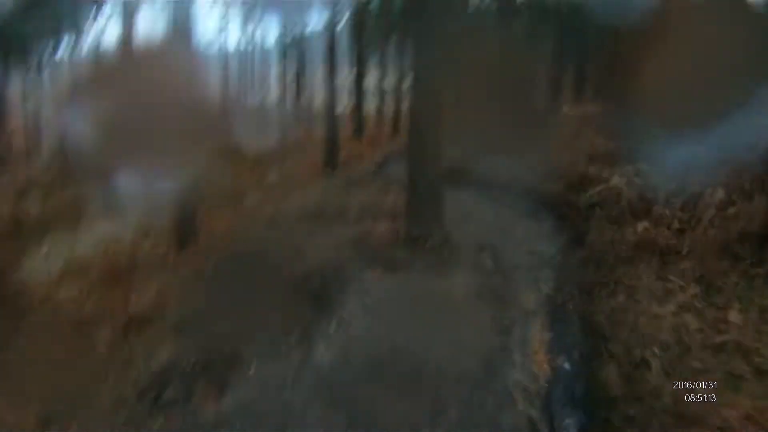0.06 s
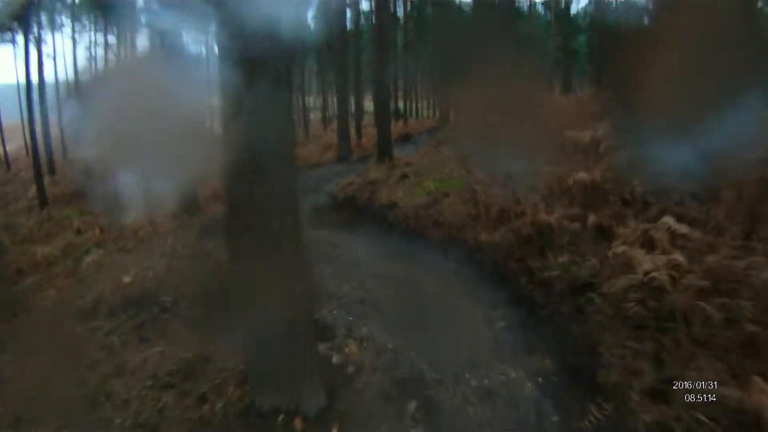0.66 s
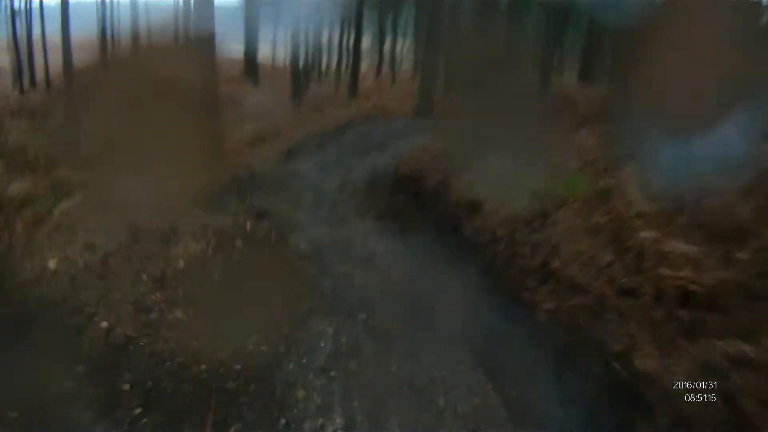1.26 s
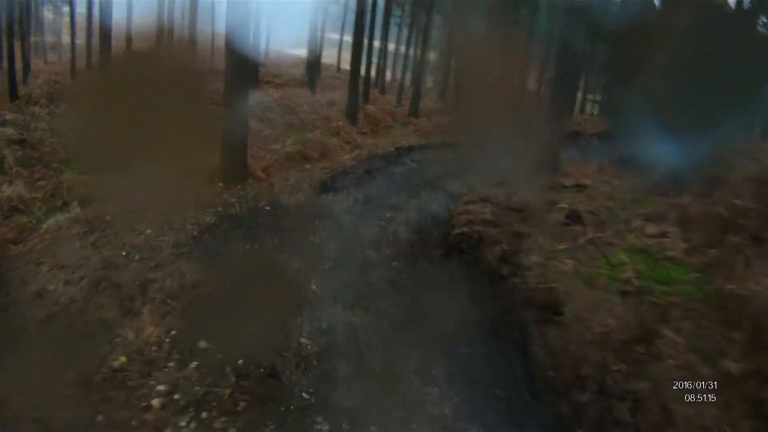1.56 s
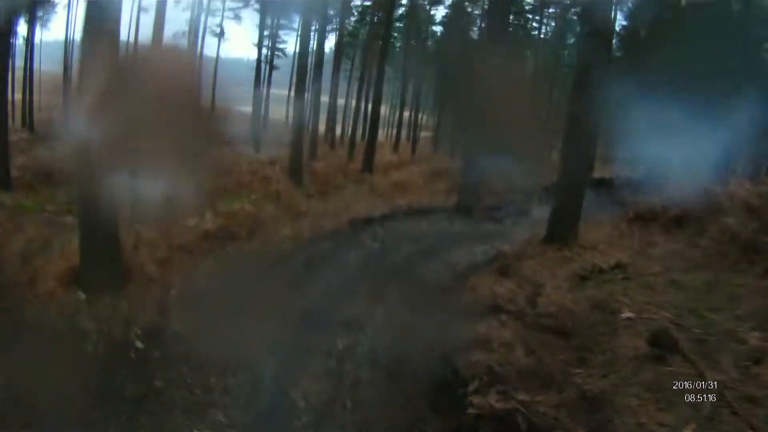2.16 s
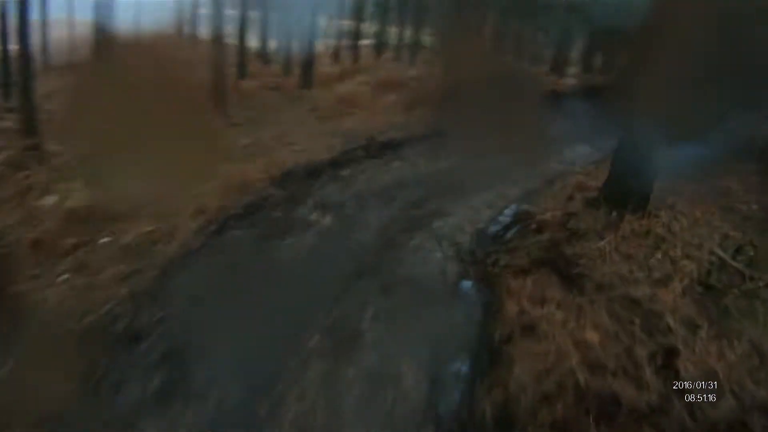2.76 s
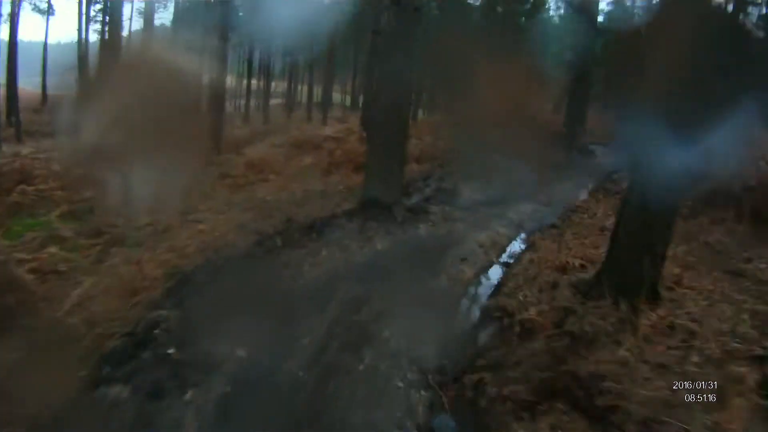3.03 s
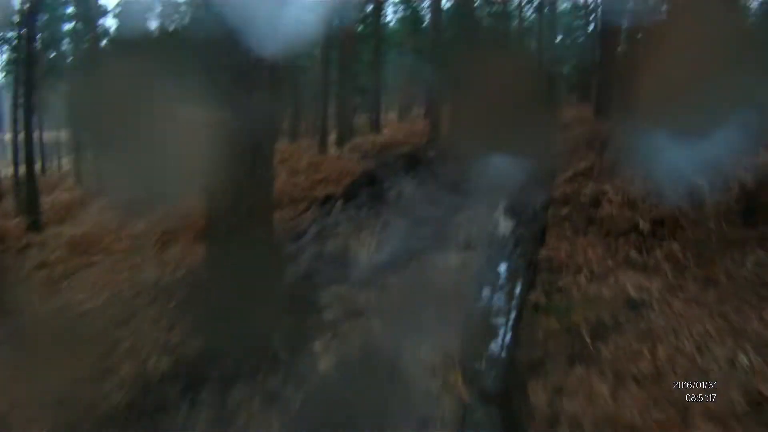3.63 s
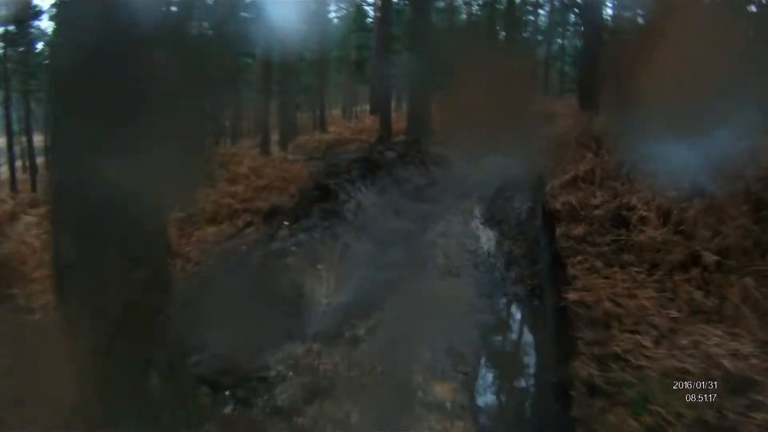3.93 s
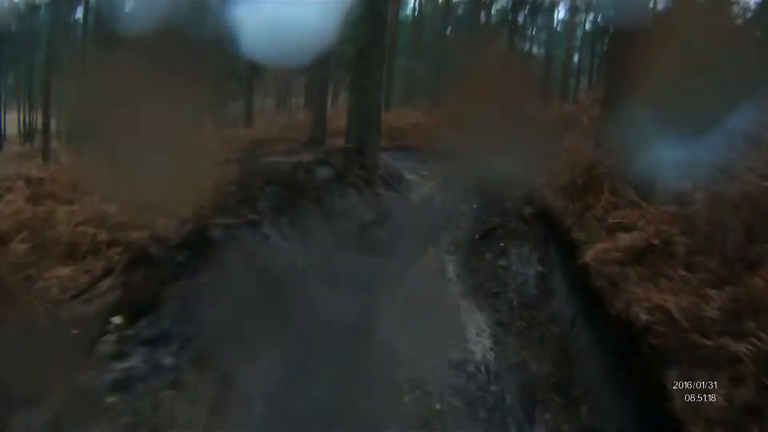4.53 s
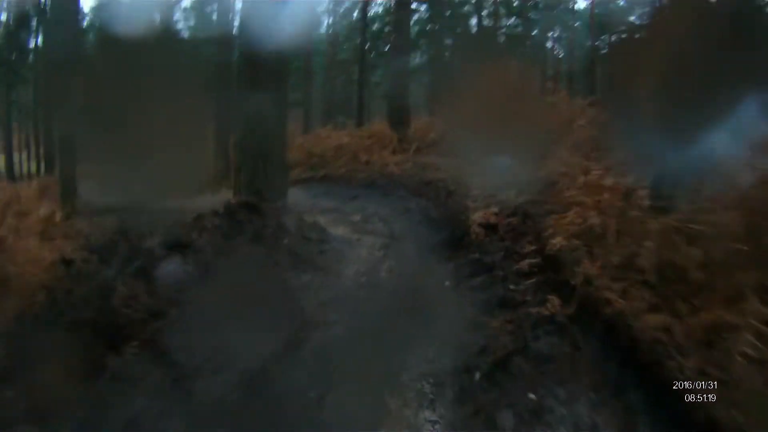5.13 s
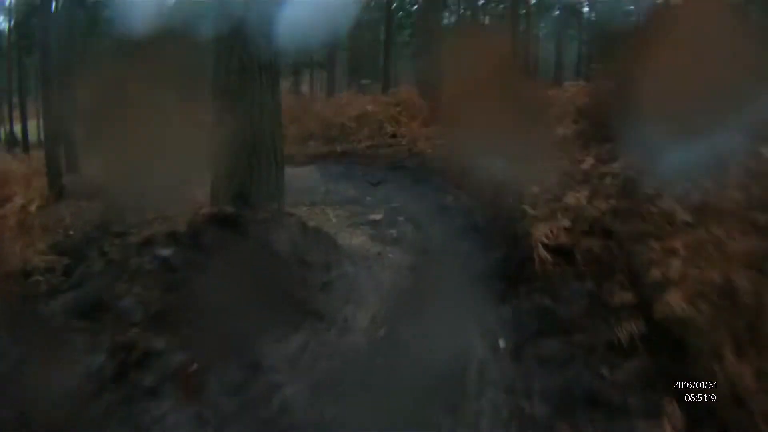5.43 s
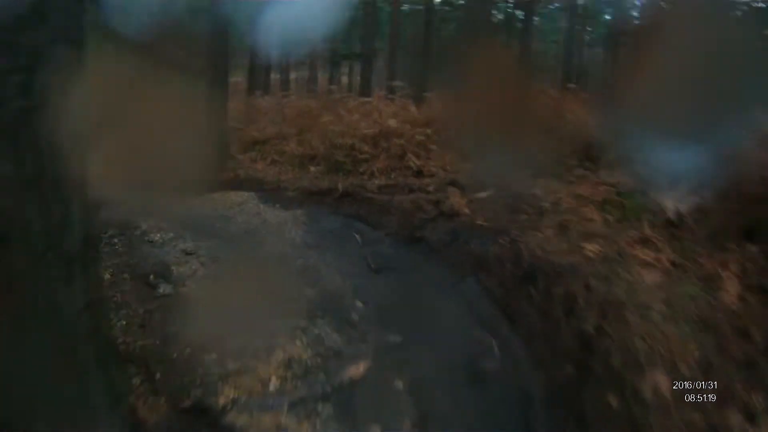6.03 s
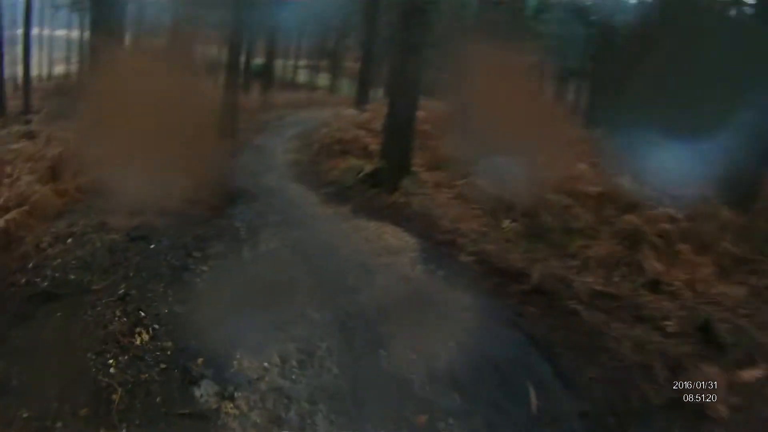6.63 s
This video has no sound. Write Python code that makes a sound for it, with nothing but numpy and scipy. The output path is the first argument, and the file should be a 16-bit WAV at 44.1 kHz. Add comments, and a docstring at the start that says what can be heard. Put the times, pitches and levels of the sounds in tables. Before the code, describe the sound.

A bicycle rolls over bumpy dirt, its chain clattering and tyres crunching, under wind that gusts and then dies away.

```python
"""Wind rushes and tyres crunch as a mountain bike rolls down a damp, bumpy forest trail, heard from a
camera in a closed plastic case. Turbulent air swells and fades around the case, over the camera's
own hiss and thin whine. Bumps rattle the chain and frame, and flung grit ticks against the bike;
these contacts are coloured by the resonances of the case. Once, a stone strikes the case itself."""
import sys
import numpy as np
from scipy import signal
from scipy.fft import rfft, irfft, next_fast_len
from scipy.io import wavfile
from scipy.ndimage import uniform_filter1d, map_coordinates

SR = 44100
rng = np.random.default_rng(int(sys.argv[2]) if len(sys.argv) > 2 else 0)


def int16_out(signal):
    """Quantize to a 16-bit WAV file."""
    q = np.round(np.clip(np.atleast_2d(signal).T, -1, 1) * 32767)
    wavfile.write(sys.argv[1], SR, q.astype(np.int16))


N = 299439
T = np.arange(N) / SR


def amp(db):
    """The decibel scale: 20 dB is a factor of ten in amplitude."""
    return 10 ** (np.asarray(db) / 20)


def unit(x):
    """Normalisation to an rms of 1."""
    return x / np.sqrt(np.mean(x ** 2) + 1e-20)


def along(points, hz):
    """Interpolation of (Hz, dB) points on a logarithmic frequency axis."""
    point_hz, point_db = np.transpose(points)
    return np.interp(np.log(hz + 1), np.log(point_hz + 1), point_db)


def level_curve(points):
    """Linear interpolation of (seconds, dB) points at every sample."""
    return np.interp(T, *np.transpose(points))


def swell(s, length):
    """A generalised Gaussian envelope, 1 at time s; an exponent above 2 flattens its top."""
    return np.exp(-np.abs(2 * (T - s) / length) ** 2.7)


def wobble(rate):
    """Smooth random modulation: a spline through rate knots a second."""
    return map_coordinates(rng.standard_normal(int(N * rate / SR) + 4), [T * rate])


def coloured(x, gain_db):
    """Minimum-phase filtering: folding the cepstrum gives a causal filter of gain gain_db(hz)."""
    size = 2 * next_fast_len(len(x) // 2 + 4096)
    gain = amp(gain_db(np.fft.rfftfreq(size, 1 / SR)))
    cepstrum = irfft(np.log(gain + 1e-6))
    cepstrum[1:size // 2] *= 2
    cepstrum[size // 2 + 1:] = 0
    return irfft(rfft(x, size) * np.exp(rfft(cepstrum)))[:len(x)]


def noise(spectrum):
    """Spectral shaping of white noise, at an rms of 1."""
    return unit(coloured(rng.standard_normal(N), lambda hz: along(spectrum, hz)))


def grains(size, rate, spread_db):
    """A Poisson process: rate tiny impacts a second, of random sign and strength."""
    hits = rng.random(size) < rate / SR
    signs = rng.choice([-1, 1], size)
    strengths = amp(spread_db * np.clip(rng.standard_normal(size), -2, 2))
    return unit(hits * signs * strengths)


# Air flow, rising and falling with riding speed. Each row: time in seconds, relative level in dB.
AIR_FLOW = [(0, -50.5), (.3, -46.5), (.8, -46), (1.08, -42.5), (1.17, -51.5), (1.24, -46.5), (1.93, -50.5),
            (2.02, -43.5), (2.64, -44.5), (2.85, -54), (3.38, -63), (3.97, -63.5), (4.15, -57),
            (4.6, -56.5), (5.38, -59), (5.8, -74.5), (6.2, -82), (6.5, -73)]
# Gusts on top of the flow. Each row: peak time in seconds, length in seconds, relative level in dB,
# share of large eddies from 0 to 1.
GUSTS = [(0.058, 0.049, -47.5, .1), (2.313, .06, -44.5, 0.05), (2.496, 0.034, -41, 0.02),
         (2.637, 0.074, -43, .7), (2.936, 0.085, -50, 0.35), (3.007, 0.056, -46, 0.4),
         (3.195, .11, -46, 0.65), (3.551, 0.12, -49, 0.3), (3.714, 0.077, -48, 0.6), (3.815, .11, -46, .15),
         (4.981, 0.079, -50, 0), (5.37, 0.13, -61.5, .3), (6.288, 0.058, -67, 0.9)]
# Jolts that shove air against the case. Each row: peak time in seconds, length in seconds, level in dB.
JOLTS = [(1.735, .05, -56), (2.292, .05, -60), (2.52, .08, -64), (2.615, .04, -56), (2.7, 0.037, -57),
         (3.14, 0.23, -62), (3.85, .05, -65), (5.1, .3, -70)]
# Spectra of the rush and the buffeting. Each row: frequency in Hz, relative level in dB.
RUSH_SPECTRUM = [(30, -37), (80, -23), (150, -9.5), (250, -1.5), (420, 1), (620, -2), (900, -9),
                 (1400, -17.5), (2500, -30), (5000, -62)]
BUFFET_SPECTRUM = [(10, -0.5), (28, -10.5), (60, -9.5), (110, -8), (250, -25), (800, -84)]
# Colouring of the rush by large eddies. Each row: frequency in Hz, relative gain in dB.
LARGE_EDDY_GAIN = [(60, 5), (120, 10), (210, 5.5), (380, -2), (700, -10)]
def wind():
    """Turbulence: slow flow sheds larger, deeper eddies; pressure on the case buffets and thumps."""
    flow_db = level_curve(AIR_FLOW)
    deep_below_db, transition_db = -52.5, 4
    power = amp(flow_db) ** 2
    large_power = power * (1 - np.tanh((flow_db - deep_below_db) / transition_db)) / 2
    for s, length, db, share in GUSTS:
        gust = amp(db) ** 2 * swell(s, length)  # incoherent sources add in power
        power += gust
        large_power += np.clip(share, 0, 1) * gust
    large_eddies = unit(coloured(noise(RUSH_SPECTRUM), lambda hz: along(LARGE_EDDY_GAIN, hz)))
    small_eddies = noise(RUSH_SPECTRUM)
    air = np.sqrt(np.abs(power - large_power)) * small_eddies + np.sqrt(large_power) * large_eddies
    rush = amp(-1.51 + 1.7 * wobble(rate=45)) * air
    mean_flow_db = uniform_filter1d(10 * np.log10(power), SR)  # buffeting follows a one-second mean
    buffet = amp(-70.5 + 0.36 * (mean_flow_db + 50) + 3 * wobble(rate=14))
    thump_power = sum(amp(db) ** 2 * swell(s, length) for s, length, db in JOLTS)
    return rush + np.sqrt(buffet ** 2 + thump_power) * noise(BUFFET_SPECTRUM)


# Transmission of contact sound through the case. Each row: frequency in Hz, gain in dB.
CASE_RESPONSE = [(100, -25.5), (500, -25.5), (950, -14), (1220, -8.5), (1350, 0.5), (1450, 4), (1650, -7),
                 (2100, -10.5), (2400, -9), (2950, -12), (3550, -8.5), (4200, -18.5), (5100, -34.5),
                 (9000, -50.5), (14000, -57)]
def contact(force, hardness, ring_hz, ring_db, width_hz):
    """Structure-borne sound: a force excites two inharmonic modes and is filtered by the case."""
    def resonance(hz, centre_hz, db):
        return amp(db) ** 2 / (1 + (2 * (hz - centre_hz) / width_hz) ** 2)

    def gain_db(hz):
        octaves = np.log2(np.clip(hz, 900, 6000) / 1440)
        tilt_db = hardness * octaves  # harder contacts are brighter
        modes = resonance(hz, ring_hz, ring_db) + resonance(hz, 1.29 * ring_hz, ring_db - 6)
        return along(CASE_RESPONSE, hz) + tilt_db + 10 * np.log10(0.5 + modes)

    return coloured(force, gain_db)


# Tyre noise, louder on rough ground. Each row: time in seconds, relative level in dB.
ROLLING = [(0, -53), (.22, -52), (.62, -60.5), (1.0, -52), (1.16, -53.5), (1.36, -51.5), (1.55, -55),
           (1.88, -52), (2.38, -54.5), (2.6, -46.5), (3.05, -56.5), (3.34, -52.5), (3.62, -60), (4.48, -59),
           (4.66, -53), (5.5, -59), (5.95, -58), (6.2, -60.5), (6.79, -62.5)]
# Crests that unload the tyres. Each row: centre time in seconds, length in seconds, dip in dB.
CRESTS = [(1.145, .05, 4), (1.81, 0.034, 5), (3.103, 0.044, 5), (5.57, 0.06, 5.5), (6.184, 0.095, 5)]
# Crackles of fine grit. Each row: resonance in Hz, hardness in dB per octave.
GRIT = [(2500, 0.5), (3500, 4)]
def tyres():
    """Granular noise: knobs crush wet dirt into a hollow crunch, a brighter spray and sparse crackles."""
    def dirt():
        return grains(N, rate=1000, spread_db=3) + 0.68 * rng.standard_normal(N)

    crunch = unit(contact(dirt(), hardness=-3.5, ring_hz=1430, ring_db=-12, width_hz=150))
    spray = unit(contact(dirt(), hardness=8, ring_hz=3530, ring_db=-1.5, width_hz=800))
    grit = unit(sum(contact(grains(N, rate=16, spread_db=3), hardness, hz, ring_db=9, width_hz=700)
                    for hz, hardness in GRIT))
    crunch *= amp(-1 + 2.3 * wobble(rate=35))
    spray *= amp(-8.5 + 2.4 * wobble(rate=25))
    dip_db = sum(db * swell(s, length) for s, length, db in CRESTS)
    return amp(level_curve(ROLLING) - dip_db) * (crunch + spray + amp(-9.5) * grit)


# Spectrum of the preamplifier hiss. Each row: frequency in Hz, relative level in dB.
HISS_SPECTRUM = [(30, 9), (200, 3.5), (700, 9), (4000, 7.5), (7000, -0.5), (9000, 1.5), (11000, -1),
                 (15000, -1.5)]
def electronics():
    """Self-noise: preamplifier hiss and a thin whine whose phase reverses sixty times a second."""
    whine = np.sin(2 * np.pi * 7867.3 * T) * signal.square(np.pi * 60.07 * T)
    return amp(-68) * whine + amp(-69.5) * noise(HISS_SPECTRUM)


# Bumps that shake the chain and frame. Each row: start in seconds, length in seconds, relative level
# in dB, hardness in dB per octave, resonance in Hz, resonance strength in dB.
BUMPS = [(.075, 0.012, -45.5, 8, 2820, 4), (0.117, 0.022, -39, 0.5, 1900, 18),
         (0.159, 0.079, -44, -3.5, 1835, 18), (0.269, 0.044, -47.5, 2, 1800, 7),
         (1.011, 0.019, -41, -3.5, 3720, 14), (1.032, .011, -46.5, 6.5, 3820, 13),
         (1.089, 0.013, -48, 4, 3020, 12), (1.205, 0.0086, -43, 6.5, 4340, 10),
         (1.322, 0.026, -43.5, -8.5, 3690, 12), (1.388, .015, -45, -9.5, 3620, 11),
         (1.625, 0.0074, -43, 10, 3720, 7), (1.666, 0.012, -43.5, 1, 2840, 9),
         (1.688, 0.0092, -38, 3, 3470, 13), (1.709, 0.013, -47, -5, 2900, 12),
         (1.826, 0.033, -40, -0.5, 4140, 5), (1.9, 0.02, -42, -5, 3400, 10),
         (2.001, 0.011, -45, 10, 2530, 14), (2.143, 0.013, -45.5, -2.5, 4280, 11),
         (2.168, 0.034, -45, 3, 3580, 6), (2.229, 0.033, -45, -7.5, 2590, 7),
         (2.342, 0.0083, -39, 4, 3170, 7), (2.49, 0.019, -40, 3, 3860, 5), (2.519, 0.024, -42, 4, 2500, 8),
         (2.549, 0.025, -37, -5, 1940, 0), (2.572, 0.01, -35, -5, 2730, 6), (2.618, .013, -42, -3, 2250, 8),
         (2.64, 0.0098, -35.5, -1, 2620, 9), (2.676, 0.014, -39, -3.5, 2560, 5),
         (2.728, 0.023, -42.5, -13, 4070, 3), (2.761, 0.017, -43, -7, 3210, 16),
         (2.796, 0.0097, -39, 2.5, 2070, 7), (2.836, 0.01, -40, -5.5, 3430, 17.5),
         (3.191, 0.013, -39, 7, 2476, 11.5), (3.255, 0.013, -47.5, 2, 2360, 9),
         (3.363, 0.015, -48.5, -3.5, 4270, 18), (4.611, .014, -46, 6.5, 1660, 6),
         (4.643, 0.02, -45, -3, 3080, 9), (4.78, 0.036, -47.5, -6, 1790, 1),
         (4.832, 0.032, -49.5, -5.5, 3330, 6), (4.893, .039, -46, -6, 2570, 9),
         (4.992, 0.015, -49.5, -4, 2730, 11), (5.864, .019, -52, 1, 1650, 1),
         (6.265, 0.032, -50, -6.5, 1700, 4), (6.714, .02, -58, -2, 1680, 5)]
# Spectrum of the frame's thud. Each row: frequency in Hz, relative level in dB.
THUD_SPECTRUM = [(30, -19), (120, 3.5), (280, 3.5), (700, -6), (2000, -45)]
def rattles():
    """Shock excitation: a bump sets off a dying flurry of contacts; metal rings and the frame thuds."""
    track, t = np.zeros(N), np.arange(SR // 5) / SR
    attack_s, thud_db = 0.0019, -15.5
    for s, length, db, hardness, ring_hz, ring_db in BUMPS:
        shake = (1 - np.exp(-t / attack_s)) * np.exp(-(t / length) ** 2)
        force = shake * (grains(len(t), rate=1300, spread_db=1.5) + 0.42 * rng.standard_normal(len(t)))
        flurry = contact(force, hardness, ring_hz, ring_db, width_hz=72)
        thud = coloured(shake * rng.standard_normal(len(t)), lambda hz: along(THUD_SPECTRUM, hz))
        rattle = unit(flurry) + amp(thud_db) * unit(thud)
        add(track, s, amp(db - 1) * rattle * np.sqrt(length / t[-1]))  # energy grows with length
    return track


# Grit and small parts hitting the bike. Each row: start in seconds, peak level in dB,
# resonance in Hz, hardness in dB per octave.
GRIT_HITS = [(0.272, -31.5, 3420, -7), (.2838, -35, 1750, 0), (0.3372, -31, 1780, 4.5),
             (.4107, -37, 3300, 0), (0.4745, -31, 1960, -4), (.56, -32.5, 1820, 2),
             (0.7478, -33, 2500, -0.5), (1.1164, -35.5, 1950, 2), (1.485, -34.5, 1750, 8),
             (1.57, -35, 2650, 8), (1.7249, -32.5, 3000, 3), (1.895, -29.5, 3280, 5),
             (2.0202, -26, 2820, 5), (2.2602, -31.5, 2580, -1), (2.5928, -31.5, 2400, 14),
             (2.9203, -36, 2420, -4), (3.0644, -38.5, 3520, -4), (3.1373, -37, 1730, -11),
             (3.4775, -40.5, 2350, -7), (3.5246, -32, 2000, -3), (3.5674, -28, 2350, -5.5),
             (3.718, -34, 2200, 3.5), (3.956, -39, 2340, -2.5), (4.0926, -43, 3370, 0),
             (4.3108, -34, 2260, 4.5), (4.711, -36, 1710, 4), (4.9198, -33.5, 2500, -2),
             (5.253, -39, 1980, 0), (5.31, -34, 2010, -2.5), (6.384, -36.5, 1720, 0),
             (6.5602, -39.5, 1810, -4), (6.5903, -43.5, 2360, -7)]
def ticks():
    """Impulse excitation: a sharp hit and a few milliseconds of scrape make the struck part ring."""
    track, t = np.zeros(N), np.arange(SR // 20) / SR
    scrape_t60_s = 0.014
    for s, db, ring_hz, hardness in GRIT_HITS:
        force = 0.34 * rng.standard_normal(len(t)) * amp(-60 * t / scrape_t60_s)
        force[0] += 1  # the hit itself
        tick = contact(force, hardness, ring_hz, ring_db=7.5, width_hz=360)
        add(track, s, amp(db) * tick / np.abs(tick).max())
    return track


# Modes of the plastic case. Each row: frequency in Hz, relative level in dB, 60 dB decay time in seconds.
CASE_MODES = [(1396, -2, 0.014), (2790, 1, 0.0065), (3500, -6, 0.0089), (5740, -8, 0.0041),
              (6320, -4, 0.0033), (8240, -12.5, 0.0029), (11400, -21, 0.0026)]
def stone():
    """Free vibration: one stone strikes the case, whose modes ring as quickly damped sinusoids."""
    track, t = np.zeros(N), np.arange(SR // 20) / SR
    start_s, attack_s, peak_db = 1.6433, 0.0003, -15.5
    ring = sum(amp(db - 60 * t / t60) * np.sin(2 * np.pi * hz * t) for hz, db, t60 in CASE_MODES)
    ring *= 1 - np.exp(-(t / attack_s) ** 2)
    add(track, start_s, amp(peak_db) * ring / np.abs(ring).max())
    return track


def add(track, s, sound):
    """Delay and sum: a sound joins the track at s seconds."""
    part = track[max(round(s * SR), 0):][:len(sound)]
    part += sound[:len(part)]


def scene():
    """Superposition: all sources sum in a single channel."""
    return (wind() + tyres() + electronics() + rattles() + ticks() + stone())[None]


def record(dry):
    """Band limiting: the camera keeps nothing above its cutoff frequency."""
    cutoff_hz = 15350
    size = next_fast_len(N + SR // 2)
    passband = np.fft.rfftfreq(size, 1 / SR) < cutoff_hz
    return irfft(rfft(dry, size) * passband, size)[:, :N]


dry = scene()
out = record(dry)
int16_out(out)
```